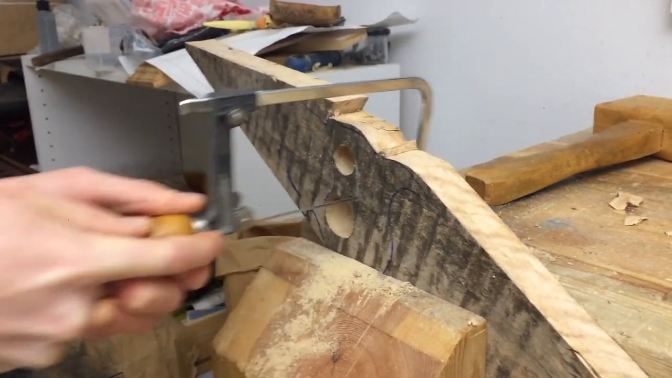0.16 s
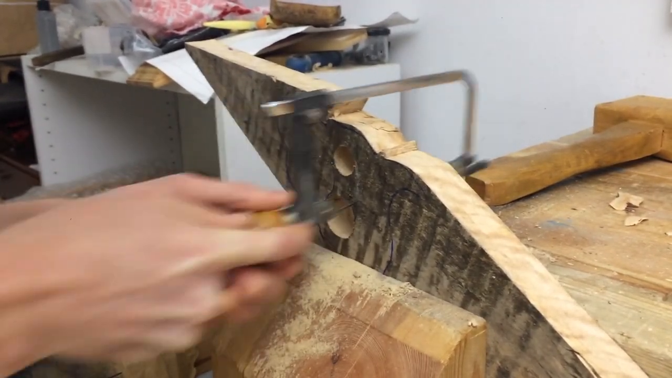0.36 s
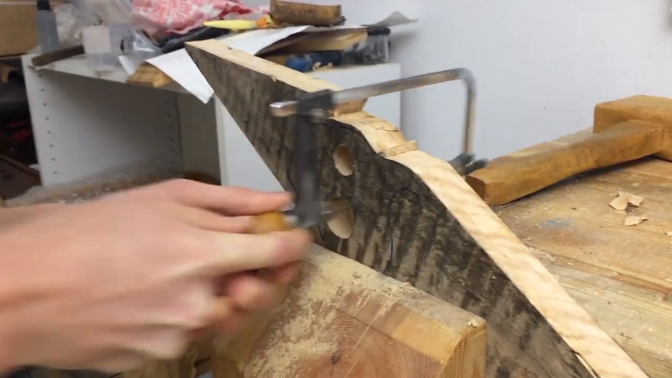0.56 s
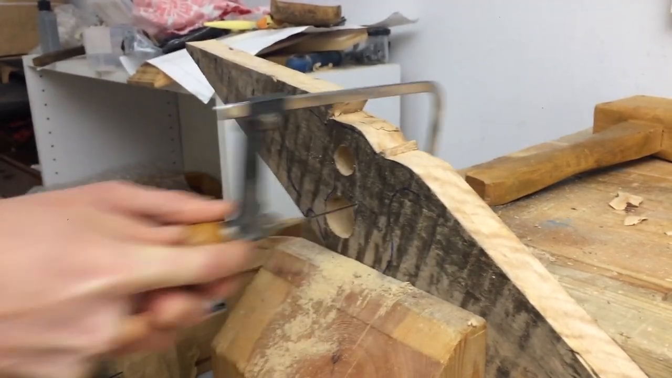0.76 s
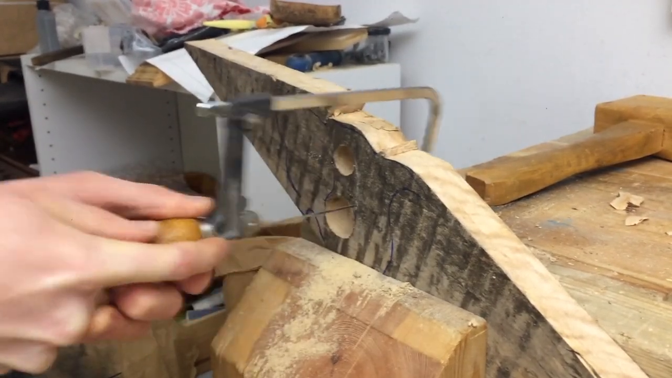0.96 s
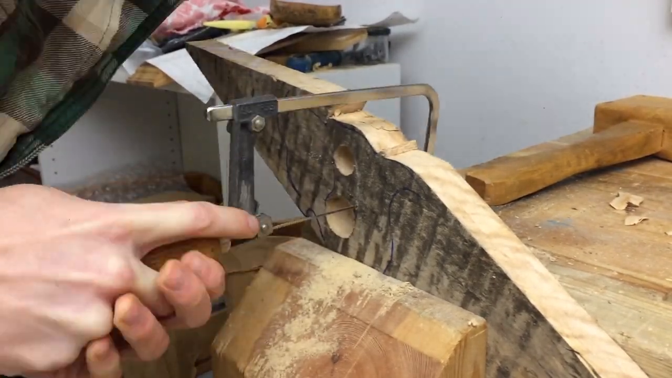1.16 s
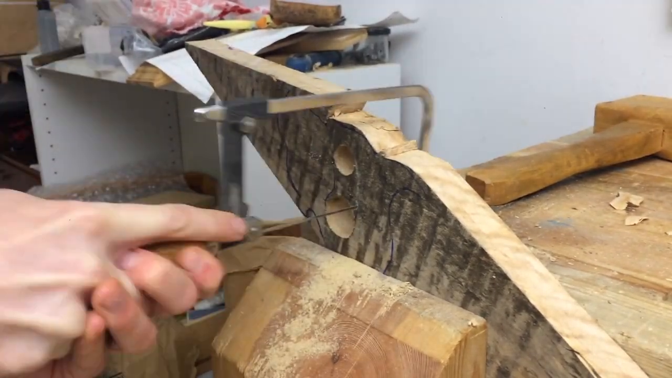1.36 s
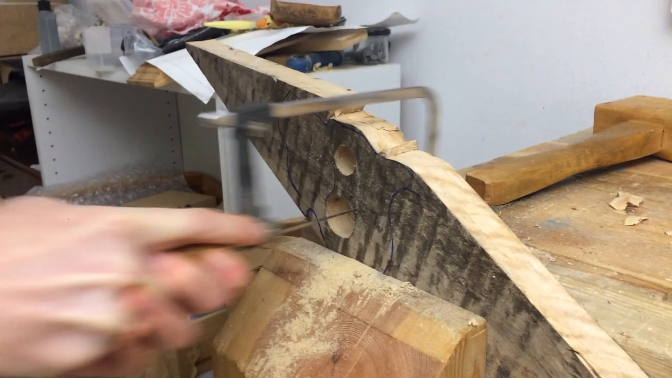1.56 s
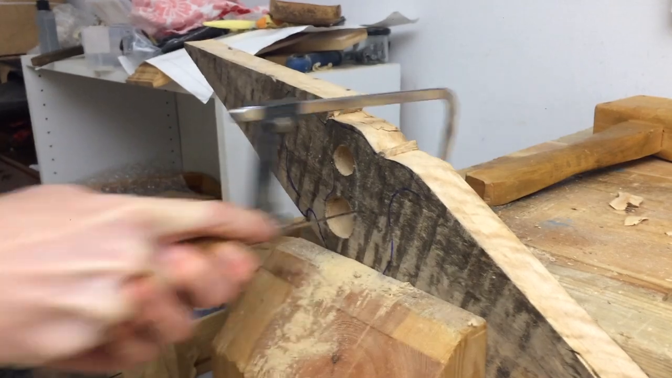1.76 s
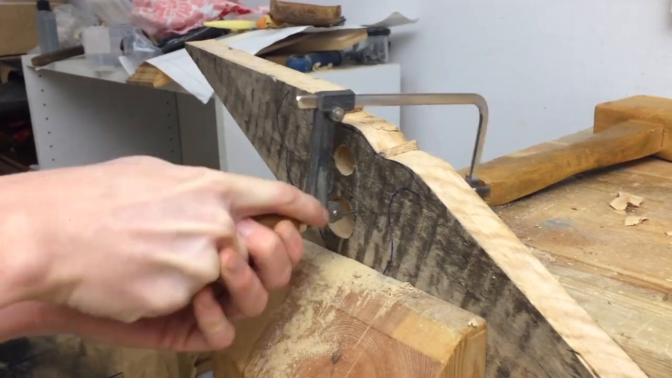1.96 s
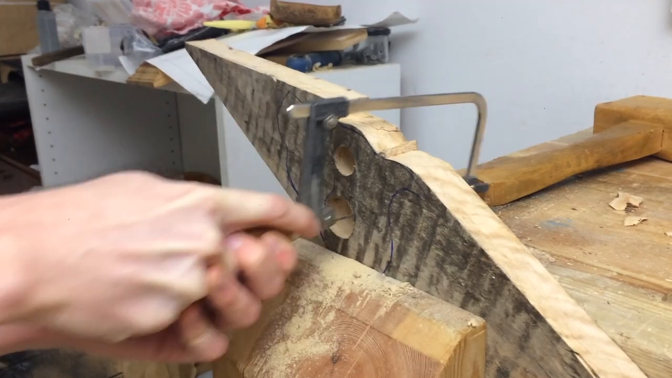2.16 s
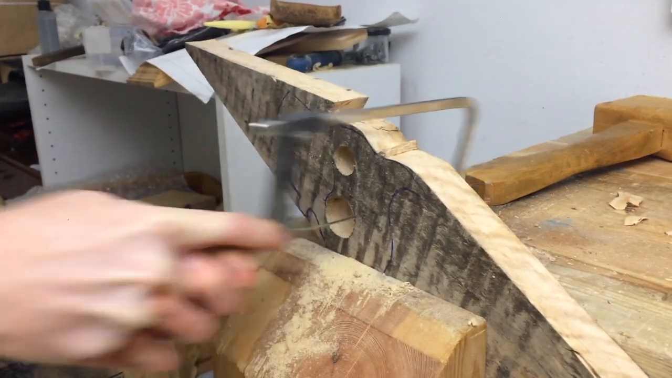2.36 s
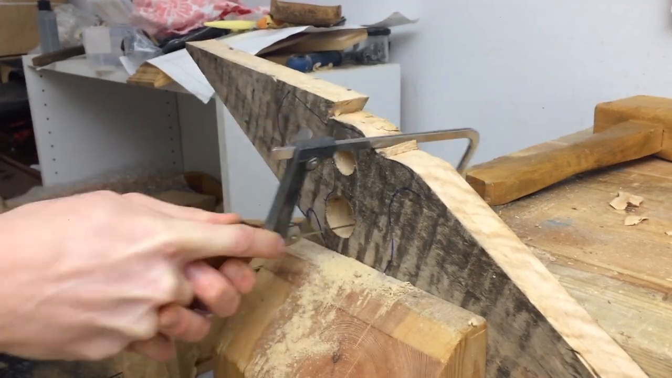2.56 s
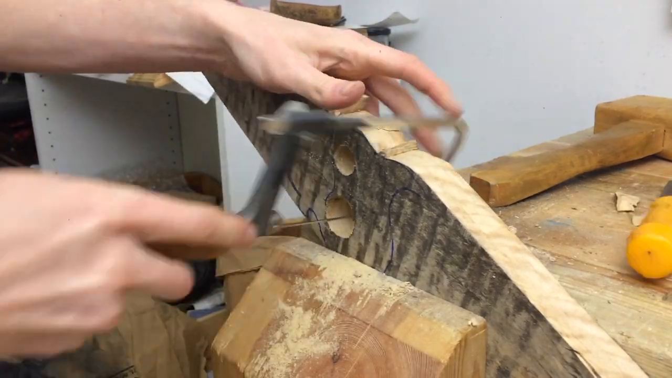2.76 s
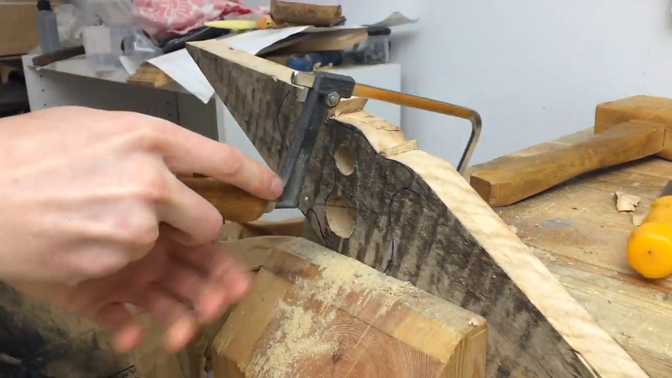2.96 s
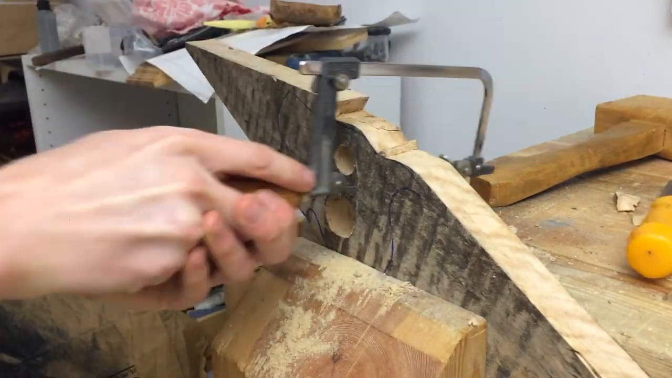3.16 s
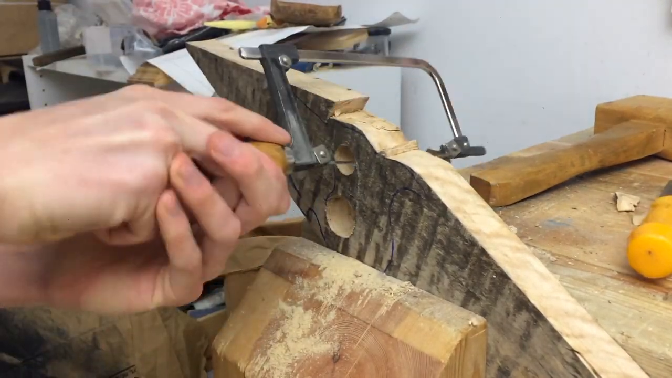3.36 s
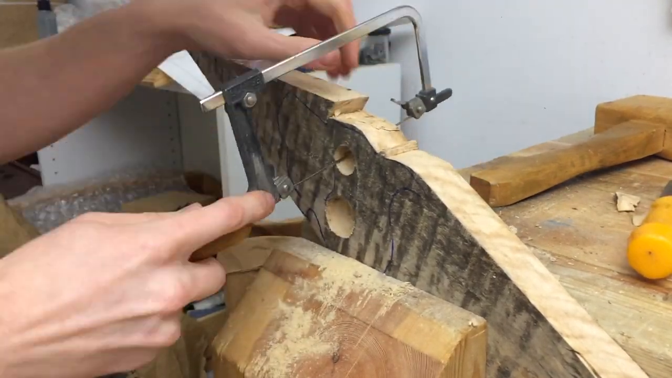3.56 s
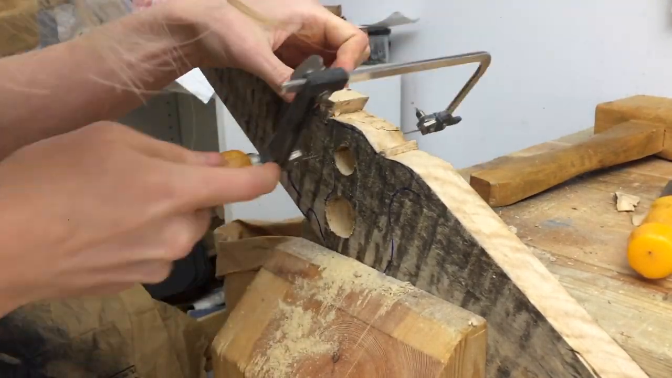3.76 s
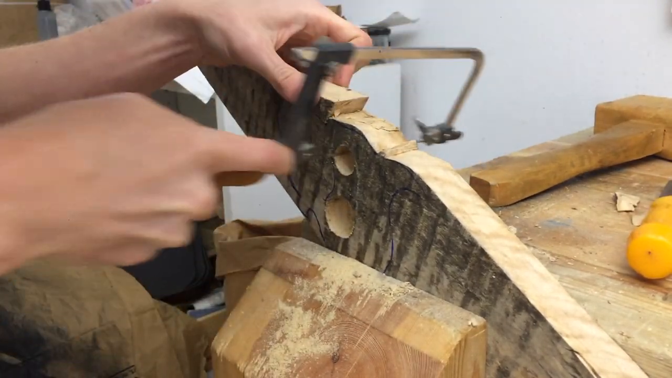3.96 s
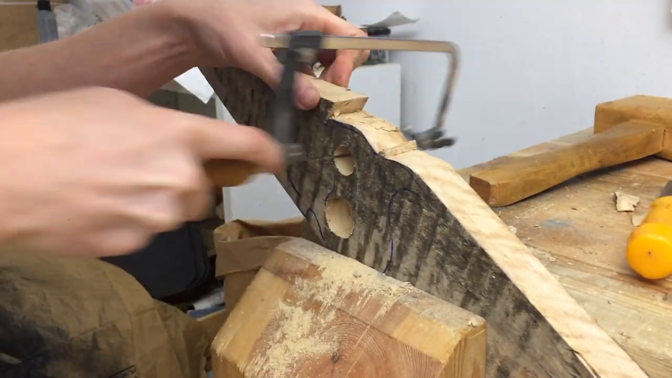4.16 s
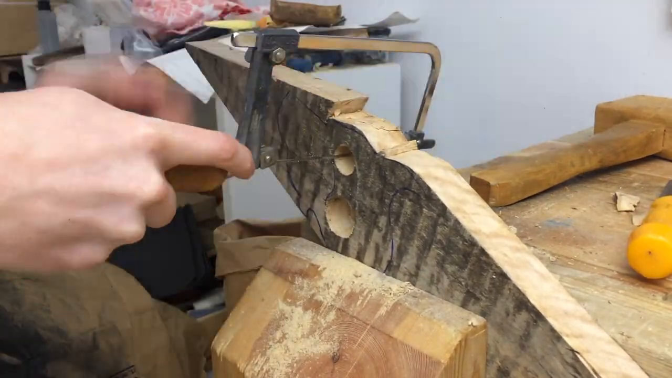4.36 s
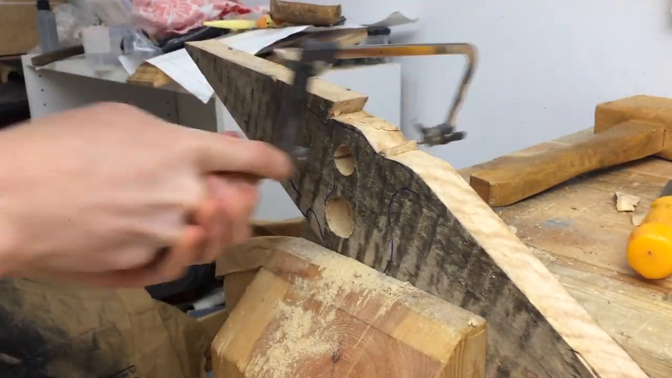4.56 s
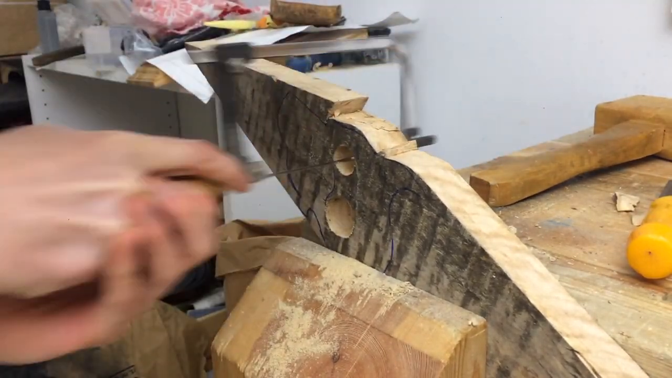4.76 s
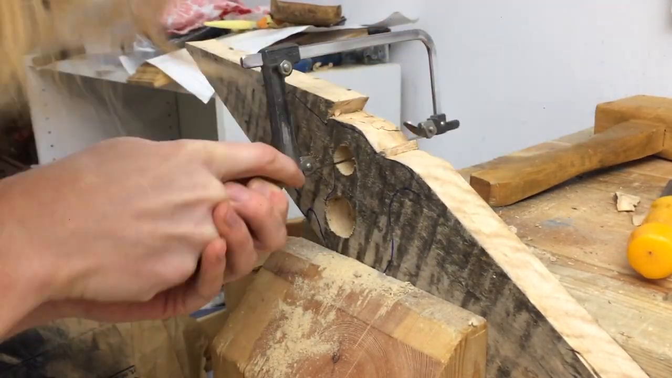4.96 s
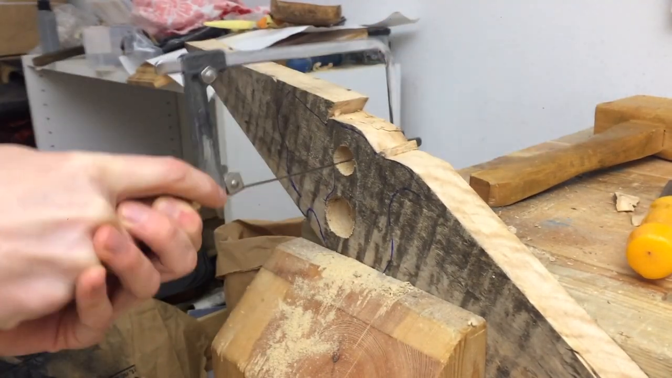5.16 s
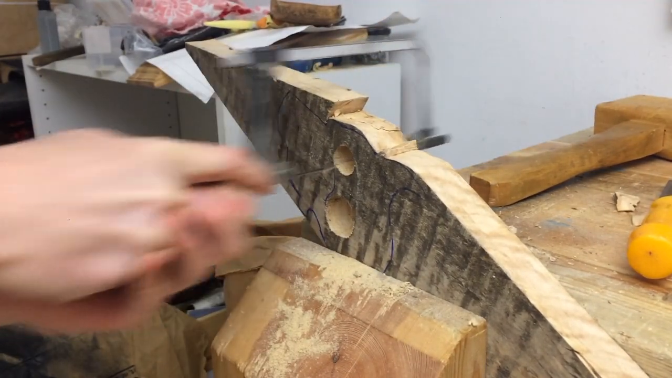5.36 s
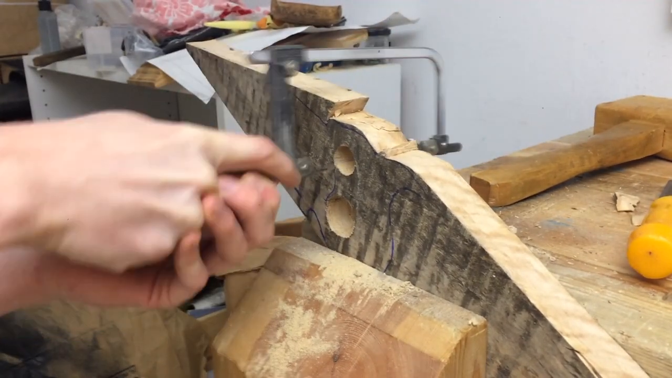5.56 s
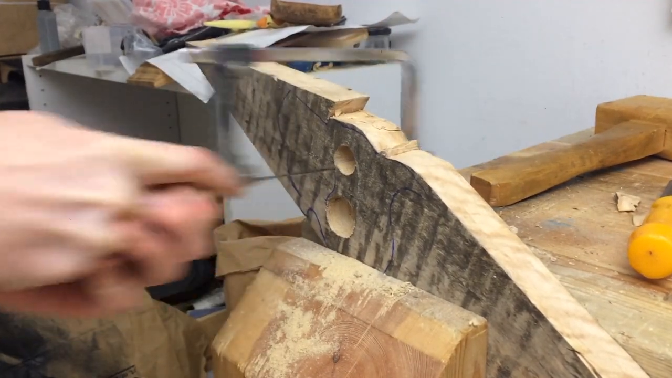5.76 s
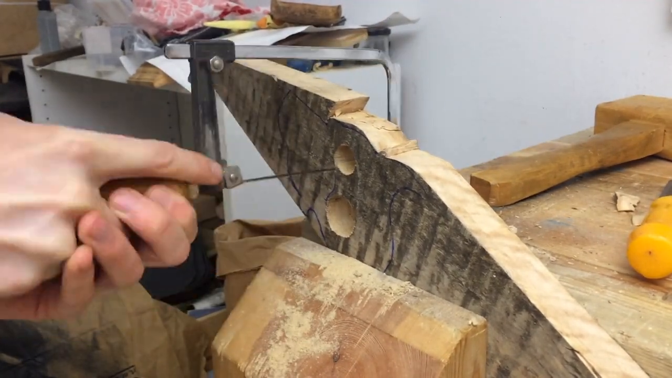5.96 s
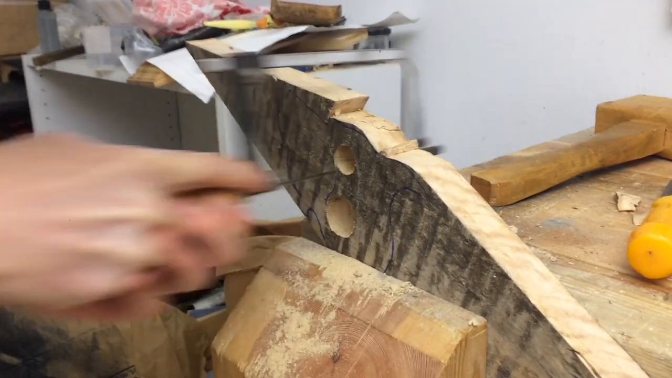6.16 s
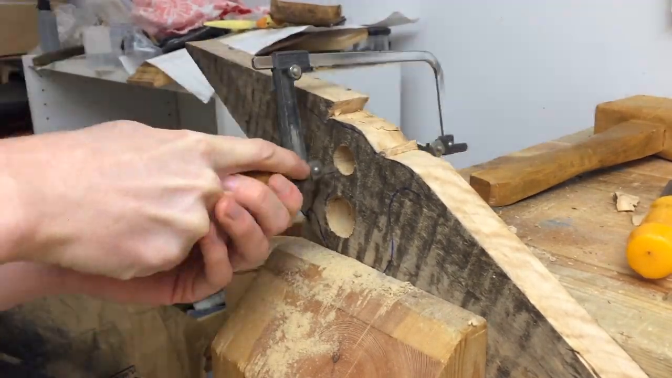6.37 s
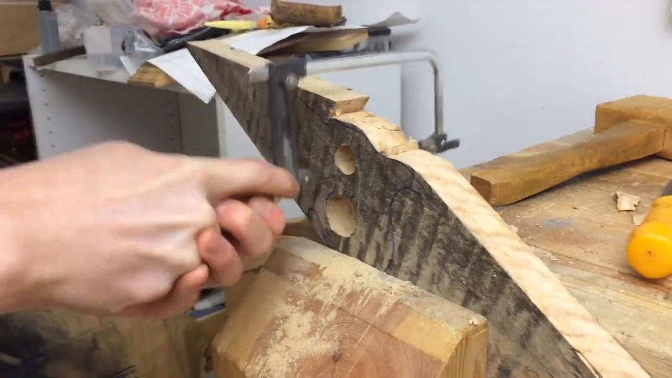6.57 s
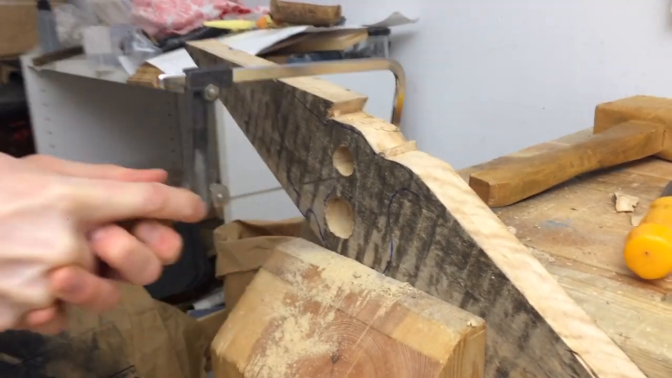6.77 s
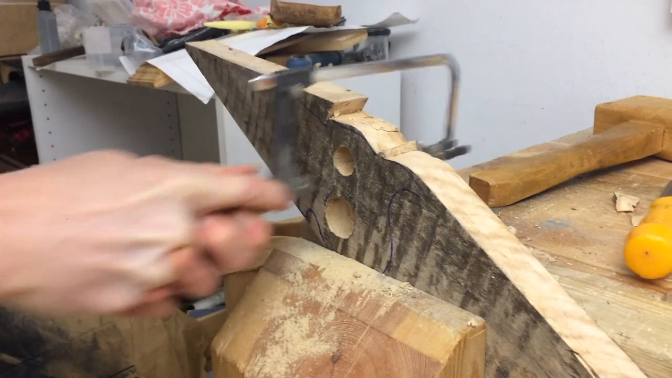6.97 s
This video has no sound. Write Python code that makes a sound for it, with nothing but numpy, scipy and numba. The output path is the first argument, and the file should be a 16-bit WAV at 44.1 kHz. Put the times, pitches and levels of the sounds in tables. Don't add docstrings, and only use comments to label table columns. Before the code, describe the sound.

Close and dry in a small workshop, with thin bass, a saw already works a clamped wooden board at fast-motion speed. From 0 to 1.1 s, about sixteen strokes a second rasp and buzz, with woody frame knocks on most early strokes. After a quiet gap, harder, ringing sawing runs from 1.4 to 2.57 s with two tiny hitches, ending in a sharp snap and clack. Faint hum, ticks and soft bumps follow; from 3.0 to 3.35 s come light, lower-pitched rubs and a hard tap at 3.17 s. A clack at 3.49 s precedes small ticks. Soft trial strokes swell from 3.85 to 4.23 s. Brighter, higher sawing builds from 4.5 s, nearly thirty strokes a second, and continues from 5.0 until a piercing clack at 5.88 s. A short uneven burst spans 6.08-6.29 s with a knock, then bright rapid sawing from 6.46 s to the cut-off at 7 s.

```python
import sys
import numpy as np
from scipy import signal
from scipy.io import wavfile
from scipy.ndimage import uniform_filter1d, minimum_filter1d
from numba import njit

SR = 44100
rng = np.random.default_rng(int(sys.argv[2]) if len(sys.argv) > 2 else 0)


def waveform_to_disk(signal):
    frames = np.transpose(np.atleast_2d(signal))
    scaled = np.clip(frames, -1, 1) * 32767
    samples = np.round(scaled).astype(np.int16)
    wavfile.write(sys.argv[1], SR, samples)


def makeup_ratio(level_db):
    decades = np.asarray(level_db, float) / 20
    return 10 ** decades


N = 308700
TIME = np.arange(N) / SR

# [t/s, pitch factor]
SPEED = [(0, 1.0117), (2.63, 0.9836), (2.66, 0.61), (2.9, 0.65), (3.06, 0.72), (3.36, 0.84), (3.62, 1.2),
         (3.82, 1.24), (4.2, 1.326), (4.45, 1.285), (7, 1.283)]
SLACK_S, SECOND_CUT_S = 2.65, 3.6

# [t/s of the fastest point, level/dB, top tooth rate f/Hz]
STARTING = [(.016,-24,2390),(.077,-28.5,2430),(.139,-19.5,2082),(.199,-25,2429),(.262,-26,2372),(.321,-25,2336),
            (.387,-25,2281),(.444,-24,2550),(.503,-26.5,2317),(.562,-26,2316),(.625,-26,2342),(.685,-26.5,2487),
            (.744,-25,2119),(.812,-24,1812),(.876,-23.5,2276),(.943,-23.5,2351),(1.002,-22.5,2400),(1.06,-25,2480)]
PRESSING = [(1.375,-46.5,2000),(1.403,-21.5,2272),(1.466,-19.5,2100),(1.526,-17,2277),(1.589,-23,2070),(1.649,-21.5,2432),(1.704,-18,2273),
            (1.769,-68,2000),(1.816,-22,2071),(1.873,-17.5,2296),(1.926,-20.5,2318),(1.982,-66.5,2000),(2.031,-20,2350),(2.083,-24,2577),
            (2.135,-20.5,2385),(2.183,-20.5,2362),(2.231,-22.5,2415),(2.279,-19,2380),(2.326,-28,2397),(2.374,-21,2380),
            (2.425,-20,2370),(2.476,-22,2282),(2.522,-23.5,2311),(2.568,-31,2552)]
THREADING = [(2.98,-62,1390),(3.034,-44,1553),(3.07,-38,1520),(3.115,-48.5,1825),(3.166,-27.5,1568),(3.2,-41,1500),
             (3.239,-35.5,1949),(3.269,-34.5,1654),(3.3,-24.5,1728),(3.325,-39,1764),(3.353,-40,2068)]
SNAP = [(3.488, -25, 1911), (3.522, -50, 1500)]
TRYING = [(3.801,-69.5,2566),(3.828,-63,2422),(3.85,-46,2560),(3.887,-40,2590),(3.925,-37,2612),(3.957,-41.5,2544),
          (3.996,-38,2620),(4.028,-36.5,2620),(4.064,-37.5,3400),(4.097,-34,2730),(4.13,-35,2577),
          (4.161,-35,2917),(4.192,-35.5,2676),(4.225,-36,2830)]
BITING = [(4.491,-53.5,2700),(4.537,-44,2720),(4.557,-36.5,2710),(4.594,-28.5,2600),(4.625,-30,3200),(4.661,-29,3250),
          (4.697,-26,2776),(4.731,-25,2231),(4.763,-24.5,2478),(4.797,-23,2699),(4.828,-25.5,2374),
          (4.858,-25,2731),(4.888,-29,2725),(4.922,-22,2718),(4.963,-31,2273)]
STEADY = [(5.002,-53.5,2726),(5.032,-29.5,2641),(5.075,-27.5,2657),(5.113,-29,2763),(5.151,-27.5,2835),(5.183,-28,3090),
          (5.22,-26.5,3000),(5.253,-31,3006),(5.289,-28,3278),(5.321,-28.5,2735),(5.356,-31.5,2910),(5.389,-28.5,3493),
          (5.428,-28,2686),(5.466,-28.5,3200),(5.501,-31.5,2988),(5.535,-35,3000),(5.568,-29.5,3206),(5.603,-30.5,3088),
          (5.638,-27,3608),(5.673,-22,3335),(5.707,-21,3084),(5.741,-29,3086),(5.779,-24.5,3044),(5.812,-26,2818),
          (5.847,-27,3457),(5.881,-25.5,3085)]
TURNING = [(6.05,-60,2750),(6.082,-28,3143),(6.13,-26.5,2801),(6.169,-27.5,2950),(6.206,-31,2302),
           (6.241,-29.5,2690),(6.285,-36,2380)]
FINISHING = [(6.457,-45,3070),(6.492,-32.5,3103),(6.529,-27.5,3166),(6.563,-27,3066),(6.601,-26,3040),(6.635,-27,2930),
             (6.673,-26.5,3108),(6.709,-24.5,3570),(6.745,-22,3980),(6.783,-26,3550),(6.818,-26,3205),
             (6.854,-24,3400),(6.888,-21,3140),(6.926,-29.5,2990),(6.96,-27,3160),(6.997,-27.5,3530)]
STROKES = [STARTING, PRESSING, THREADING, SNAP, TRYING, BITING, STEADY, TURNING, FINISHING]
# [rise/ms, fall/ms, return level/dB, board level/dB at first stroke, at last stroke]
BOUTS = [
    (11, 13, -41, -53, -50),
    (11, 9.7, -42.5, -48, -54.5),
    (14, 14, -61.5, -57.5, -48.5),
    (10, 13, -41.5, -50, -53.5),
    (7.6, 7.5, -32, -46, -51),
    (10.6, 11, -40, -43, -53),
    (6.0, 11, -39, -51, -49.5),
    (6, 10, -39.5, -44.5, -49.5),
    (7.5, 8, -37.5, -45, -46),
]
# [last return level/dB, after-ring level/dB, hum level/dB, rustle level/dB at start, at end]
PAUSES = [(-45.5, -59, -70, -72, -75.5), (-49.5, -54.5, -65.5, -83.5, -64.5), (-63.5, -76, -66.5, -73, -67),
          (-60, -68, -68, -72, -78), (-34.5, -61, -73.5, -75, -74), (-66, -108, -77, -79, -67),
          (-50.5, -47.5, -72, -78, -78), (-74, -91, -72.5, -91, -68)]
RISE_MS_PER_DB, FALL_MS_PER_DB = 0.27, -0.29
RETURN_PER_DB, RETURN_UNDER_DB, RETURN_SCATTER_DB = -0.72, -5.5, 2
# [t/s, length/s, level/dB]
DRAGS = [(0, 0.0086, -43.5), (1.359, .018, -56.5), (2.962, 0.023, -54), (3.031, .02, -40),
         (3.059, .032, -40), (3.177, .04, -45), (6.269, 0.026, -48)]

# [multiple of the tooth rate, level/dB in first cut, level/dB in second cut]
TOOTH = [(1, -14, -16), (2, -9, -9), (3, -4, -5), (4, -11, -13.5)]
SING_DB = [0.1, 1.2, 0.1, 0.1, 0.1, 1.3, 1.4, 1.08, 2.5]
BRIGHT_DB = [2.9, 2, -0.5, -3, -2.5, -4, 3, 5.5, 3.5]
# [f/Hz, width/Hz, lift/dB]
BLADE_FIRST = [(2100, 47, 13.5), (3052, 69, 13.5), (4090, 135, 19), (4300, 33, 2.5), (4730, 130, 3.5),
               (5240, 160, 8), (6025, 130, 6.5), (7030, 140, 6.5), (7164, 90, 6), (7254, 500, 8),
               (11950, 1600, 10.5), (15300, 1200, 12.5), (5505, 2620, 6.5)]
# [f/Hz, width/Hz, lift/dB]
BLADE_SLACK = [(3010, 146, 15.5), (4150, 107, 15), (5449, 1500, 4.5), (11480, 590, 0), (13700, 3800, -10),
               (16300, 1499, 10.5), (18600, 2800, -4)]
# [f/Hz, width/Hz, lift/dB]
BLADE_SECOND = [(3200, 630, 6.1), (3953, 170, 14.3), (5270, 262, 11.65), (5870, 520, 5.4), (6960, 460, 5.6),
                (8500, 63, 3.3), (8920, 210, 6.6), (9180, 160, 5.2), (9700, 170, 6.4), (9330, 850, 5.5),
                (11090, 540, 8.6), (14480, 550, 7), (5540, 820, 2.8), (8190, 3860, 4.06)]
BUZZ_FOCUS, TEAR_FOCUS = 0.76, 0.73
WANDER, PATCHY_DB = 0.008, 2

# [f/Hz, width/Hz, level/dB]
BOARD_FIRST = [(246, 3600, -14), (443, 65.6, 8), (630, 420, -2.5), (950, 340, -0.5), (1220, 70, -0.5),
               (1770, 2200, -8.5)]
# [f/Hz, width/Hz, level/dB]
BOARD_SLACK = [(441, 60, 7), (897, 65, 5.5), (1150, 68, -3), (2220.5, 130, -3.5), (2950, 120, -4),
               (1500, 1700, -13.5)]
# [f/Hz, width/Hz, level/dB]
BOARD_SECOND = [(350, 1100, -19), (639, 120, 0.5), (1001, 82, -3.5), (1160, 91, -2.5), (1380, 49, -2.5),
                (1664, 130, -6.5), (2480, 37, -16), (2750, 54, -11)]
CHATTER, GRAIN_DB = 0.82, 2.4
BUZZ_DB, BUZZ_SCATTER_DB, BUZZ_JITTER = -1.0, 2.0, 0.4
DRONE_DB = [-50, -56.5, -64, -63, -66, -62.5, -61, -62, -56]
DRONE_HZ, SECOND_DRONE_HZ, DRONE_WIDTH_HZ = 427, 453.6, 45

# [t/s, peak level/dB, f/Hz]
KNOCKS = [(0.056, -26, 1230), (0.118, -29.5, 1285), (0.179, -28.5, 1220), (0.239, -23.5, 1230),
          (0.303, -33, 1254), (0.363, -28, 828), (0.422, -22.5, 887), (0.484, -29.5, 824),
          (0.543, -22.5, 830), (0.606, -31, 1295), (0.663, -23.5, 840), (0.742, -36, 1259),
          (1.265, -50.5, 977), (2.004, -33.5, 900), (2.566, -26.5, 2820), (2.609, -25.5, 3054),
          (3.485, -24, 799), (3.639, -46, 1310), (4.421, -46.5, 1538), (6.078, -58, 3800),
          (6.226, -28, 1500), (6.408, -62, 1550), (6.49, -28, 3205)]
CLICK_DB, CLICK_S, CLICK_HZ, CLICKS_END_S = 2.5, 0.0018, 2000, 0.8
# [t/s, peak level/dB,
# f/Hz]
TICKS = [(2.6773, -57, 7160), (2.6938, -53.5, 7040), (2.8417, -51.5, 5540), (2.855, -52, 8160),
         (2.873, -48, 10800), (2.885, -49, 3400), (2.9662, -44, 4300), (2.978, -42, 4210), (3.6, -57, 5010),
         (3.642, -46.5, 6000), (3.6827, -56, 6500), (3.715, -55, 4630), (3.767, -58, 8360),
         (4.355, -64, 6660), (4.482, -48.5, 4000), (4.5, -44, 4050), (4.51, -48, 4974), (5.884, -22, 4785),
         (5.955, -61, 5984)]
# [t/s, peak level/dB, f/Hz, ring/s]
THUDS = [(1.268, -51, 288, 0.037), (2.61, -47, 172, 0.044), (2.783, -58, 287.5, 0.13),
         (2.884, -53.5, 148.2, 0.18), (3.028, -44, 269.5, .06), (3.169, -41, 140.2, 0.05),
         (3.312, -45.5, 143, 0.049), (3.495, -35.5, 410, 0.13), (3.641, -71, 250, 0.053),
         (1.265, -47, 1150, 0.022), (3.593, -59, 1200, 0.044), (3.719, -54, 982, 0.046),
         (6.406, -50.5, 1500, 0.028), (4.421, -48, 1500, 0.025), (5.8836, -15.5, 5070, 0.026),
         (5.885, -17.5, 3890, 0.015), (6.489, -20.5, 3200, 0.024), (3.171, -26.5, 1850, 0.033),
         (3.171, -31.5, 1593, 0.044), (3.171, -31, 2280, 0.039), (3.171, -33, 620, 0.044)]
# [t/s, peak level/dB, centre f/Hz, width/Hz, decay/ms]
CATCHES = [(1.264, -50, 1299, 3500, 2.6), (2.5704, -14, 8020, 9000, 1.2), (2.608, -31.5, 7000, 12000, 2.3),
           (3.026, -35, 5000, 9000, 3), (3.172, -22, 2400, 3500, 1.8), (3.485, -29, 4500, 6000, 1.7),
           (3.449, -55, 906, 1500, 4.7), (4.355, -54, 1500, 2980, 3), (4.356, -53, 7500, 3020, 2.8),
           (4.423, -48, 1300, 3000, 2.5), (4.455, -59, 1600, 700, 3.7), (6.077, -29, 6000, 9000, 3),
           (6.405, -46.5, 900, 2000, 3), (6.489, -23, 2813, 4500, 1.7), (6.587, -34, 1500, 3000, 1.75),
           (6.697, -29.5, 2000, 4000, 2.14)]
# [from t/s, to t/s, level/dB, f/Hz, width/Hz]
WHISK = (3.36, 3.72, -70, 12200, 900)

STOP_S, AFTER_RING_S = 0.014, 0.019
HUM_SWAY_DB = 2.2
ROOM_T60_S, ROOM_DB = 0.036, -13


def curve(rows, column=1):
    rows = np.array(rows)
    return np.interp(TIME, rows[:, 0], rows[:, column])


def by_bout(values):
    return curve([(bout[k][0], value) for bout, value in zip(STROKES, values) for k in (0, -1)])


def unit(x):
    return x / np.sqrt(np.mean(x ** 2))


def flicker(rate):
    hold = int(SR / rate)
    levels = np.repeat(rng.standard_normal(N // hold + 1), hold)
    return 1.3 * uniform_filter1d(levels, hold)[:N]


def place(out, s, sound):
    start = int(s * SR)
    out[start:start + len(sound)] += sound


def highpass(x, hz, order=2):
    return signal.sosfilt(signal.butter(order, hz, "high", fs=SR, output="sos"), x)


@njit
def svf(x, hz, width):
    y, b, l, g, k = np.empty(len(x)), 0., 0., 0., 0.
    for i in range(len(x)):
        if i & 31 == 0:
            g = np.tan(np.pi * min(hz[i] / SR, .47))
            k = width[i] / hz[i]
        v = (b + g * (x[i] - l)) / (1 + g * (g + k))
        b, l, y[i] = 2 * v - b, l + 2 * g * v, k * v
    return y


def band(x, hz, width):
    return svf(x, np.full(len(x), float(hz)), np.full(len(x), float(width)))


def body(x, modes, pitch):
    out = 0
    for k, (hz, width, db) in enumerate(sorted(modes)):
        out = out + (-1) ** k * makeup_ratio(db) * svf(x, hz * pitch, width * pitch)
    return out


def steel(x, modes, pitch):
    for hz, width, db in modes:
        x = x + (makeup_ratio(db) - 1) * svf(x, hz * pitch, width * pitch)
    return highpass(x, 2300)


def two_cuts(ring, push, mode_sets, pitch):
    a, b = int(SLACK_S * SR), int(SECOND_CUT_S * SR)
    first, slack, second = mode_sets
    return np.r_[ring(push[:a], first, pitch[:a]),
                 ring(push[a:b], slack, pitch[a:b]),
                 ring(push[b:], second, pitch[b:] / SPEED[-1][1])]


def taps(table, partials, ring, crack_db, crack_hz, spread, early_s):
    out, t = np.zeros(N + SR), np.arange(SR // 10) / SR
    noise = rng.standard_normal((len(table), len(t)))
    fade = np.exp(-np.log(1000) * t / ring) * (1 - np.exp(-t / 0.0018))
    for (s, db, hz), hiss in zip(table, noise):
        tone = sum(makeup_ratio(g_db) * np.sin(2 * np.pi * min(hz * ratio, 16000) * t) for ratio, g_db in partials)
        wobble = 1 + 5.7 * uniform_filter1d(hiss, size=40)
        centre = max(crack_hz, hz)
        crack = band(hiss, centre, spread * hz)
        crack = unit(band(crack, centre, 2 * spread * hz)) * np.std(crack)
        usual = np.sqrt(np.sum((fade * crack) ** 2) / np.sum(fade ** 2) / np.mean(crack ** 2))
        crack = crack / usual
        place(out, s - early_s, makeup_ratio(db) * fade * (tone * wobble + makeup_ratio(crack_db) * crack))
    return highpass(out[:N], 330)


def drags(edge_s=0.00196):
    press = np.zeros(N)
    for s, length, db in DRAGS:
        press += makeup_ratio(db) * np.clip(np.minimum(TIME - s, (s + length - TIME) / 2) / edge_s, 0, 1)
    return press


def drone(pitch, lead_s=0.013, tail_s=0.024):
    on = np.zeros(N)
    for bout, db in zip(STROKES, DRONE_DB):
        inside = np.minimum(TIME - bout[0][0] + lead_s, bout[-1][0] + tail_s - TIME)
        on += makeup_ratio(db) * np.clip(inside * 100, 0, 1)
    hz = np.where(TIME < SECOND_CUT_S, DRONE_HZ, SECOND_DRONE_HZ) * pitch
    hum = svf(makeup_ratio(8.7 * flicker(40)) * rng.standard_normal(N), hz, DRONE_WIDTH_HZ * pitch)
    return unit(svf(hum, hz, 3.0 * DRONE_WIDTH_HZ * pitch)) * on


def stroke_rows():
    rows = []
    last_returns = [pause[0] for pause in PAUSES] + [BOUTS[-1][2]]
    for bout, (rise, fall, back_db, *_), last_db in zip(STROKES, BOUTS, last_returns):
        s, db, hz = np.array(bout).T
        harder = np.clip(db - np.median(db), -6, 6)
        back = back_db + RETURN_PER_DB * harder + RETURN_SCATTER_DB * rng.standard_normal(len(s))
        back[-1] = last_db
        rows.append(np.c_[s, rise + RISE_MS_PER_DB * harder, fall + FALL_MS_PER_DB * harder, db, hz,
                          np.minimum(back - db, RETURN_UNDER_DB), harder])
    return np.vstack(rows)


def strokes(rise_pow=1.73, fall_pow=2.55, back_pow=0.88, slowest=0.15, speed_up=0.6, slow_down=1.9,
            back_skew=0.57):
    cut, back, tooth_hz = np.zeros(N), np.zeros(N), np.full(N, 1000.)
    rows = stroke_rows()
    starts = rows[:, 0] - rows[:, 1] / 1000
    gaps = np.diff(starts)
    cycle = np.r_[np.minimum(gaps, 1.08 * signal.medfilt(gaps, kernel_size=5)), gaps[-1]]
    for (s, rise, fall, db, hz, back_db, harder), start, period in zip(rows, starts, cycle):
        rise, fall = 1.1 * rise / 1000, 1.5 * fall / 1000
        part = slice(max(int((s - rise) * SR), 0), int((s + fall) * SR))
        late = TIME[part] - s
        rising = late < 0
        arc = np.cos(np.pi / 2 * np.clip(late / np.where(rising, rise, fall), -1, 1))
        bite = 1 + np.clip(.4 + harder / 3.5, 0, 1.7) * np.exp(-(late / .0024) ** 2)
        cut[part] += makeup_ratio(db - 2.5) * bite * arc ** np.where(rising, rise_pow, fall_pow)
        tooth_hz[part] = hz * (slowest + (1 - slowest) * arc ** np.where(rising, speed_up, slow_down))
        first, last = s + 0.84 * fall, max(start + period + 0.00073, s + fall + 0.0025)
        part = slice(int(first * SR), int(last * SR))
        arc = np.sin(np.pi * np.clip((TIME[part] - first) / (last - first), 0, 1) ** back_skew)
        back[part] += makeup_ratio(db + back_db + 2.0) * arc ** back_pow
    return cut, back, tooth_hz


def blade(cut, back, tooth_hz, pitch, squeal_db=-32.0, bright_db=7.0):
    phase = 2 * np.pi * np.cumsum(tooth_hz * (1 + 0.01188 * flicker(900))) / SR
    second = TIME > SECOND_CUT_S
    teeth = np.zeros(N)
    for order, db, late_db in TOOTH:
        teeth += makeup_ratio(np.where(second, late_db, db) + 1.2 * flicker(450)) * np.sin(order * phase)
    top_hz = -minimum_filter1d(-tooth_hz, size=SR // 40)
    teeth = teeth * (tooth_hz / top_hz) ** BUZZ_FOCUS * makeup_ratio(by_bout(SING_DB))
    tearing = makeup_ratio(2.2 * flicker(1500)) * rng.standard_normal(N)
    for hz in (3000., 11000.):
        tearing = tearing + (makeup_ratio(PATCHY_DB * flicker(120)) - 1) * svf(tearing, hz * pitch, hz * pitch / 2)
    tear = cut / (1 + cut / makeup_ratio(squeal_db)) * makeup_ratio(9.5) * (tooth_hz / top_hz) ** TEAR_FOCUS
    push = cut * teeth + (tear + back) * tearing
    lift = makeup_ratio(bright_db * np.clip(top_hz / pitch / 2300 - 1, -.2, .2) + by_bout(BRIGHT_DB))
    push = push + (lift - 1) * svf(push, 7200 * pitch, 3500 * pitch)
    wandering = pitch * (1 + WANDER * flicker(25))
    return two_cuts(steel, push, (BLADE_FIRST, BLADE_SLACK, BLADE_SECOND), wandering) * makeup_ratio(-13.0)


def board(cut, back, tooth_hz, pitch, depth=0.55, full_db=-21.0, buzz_depth=0.42):
    soft_cut = cut / (1 + cut / makeup_ratio(full_db))
    press = (soft_cut + back) ** depth
    usual = np.sqrt(np.abs(uniform_filter1d(press ** 2, size=SR // 14))) + 0.41
    push = press / usual * makeup_ratio(2.2 * flicker(300) + GRAIN_DB * flicker(80))
    fibres = np.clip(rng.standard_normal(N), -2.9, 2.9)
    push = push * fibres * np.abs(fibres) ** (3 * CHATTER)
    slowing = uniform_filter1d(1. * (np.gradient(tooth_hz) < 0), size=90)
    phase = 2 * np.pi * np.cumsum(tooth_hz * (1 + BUZZ_JITTER * flicker(500))) / SR
    buzz = makeup_ratio(BUZZ_DB + BUZZ_SCATTER_DB * flicker(60)) * slowing * np.sin(phase)
    push = push + buzz * soft_cut ** buzz_depth / usual
    drum = two_cuts(body, push, (BOARD_FIRST, BOARD_SLACK, BOARD_SECOND), pitch)
    levels = [(bout[k][0] - k * 1e-3, how[3 - k]) for bout, how in zip(STROKES, BOUTS) for k in (0, -1)]
    return unit(drum) * makeup_ratio(curve(levels) + 1.0)


def clicks():
    out, t = np.zeros(N), np.arange(SR // 100) / SR
    for (s, db, _), hiss in zip(KNOCKS, rng.standard_normal((len(KNOCKS), len(t)))):
        if s < CLICKS_END_S:
            place(out, s - 0.0015, makeup_ratio(db + CLICK_DB) * hiss * np.exp(-t / CLICK_S))
    return band(band(out, CLICK_HZ, 3600), CLICK_HZ, 3600)


def knocks():
    partials = [(1, -7.5), (.38, -8.5), (0.6, -9.0), (2.1, -21.5), (5.7, -34.5)]
    return taps(KNOCKS, partials, ring=0.058, crack_db=6.0, crack_hz=1150, spread=0.43, early_s=0.001163)


def pauses(pitch):
    rows, ring = [], np.zeros(N)
    for done, coming, (_, ring_db, hum_db, first_db, last_db) in zip(STROKES, STROKES[1:], PAUSES):
        stop = done[-1][0] + STOP_S
        rows += [(stop, first_db, hum_db), (max(coming[0][0], stop), last_db, hum_db)]
        ring += makeup_ratio(ring_db) * np.exp(-np.abs(TIME - stop) / AFTER_RING_S)
    hiss = makeup_ratio(1.5 * flicker(60)) * rng.standard_normal(N)
    cloth = [(3400, 3600, 2.4), (7040, 3300, 3.3), (12000, 2800, 2.2), (16000, 5000, 1.5)]  # Hz, width Hz, dB
    rustle = body(hiss, cloth, pitch ** .6)
    sway = makeup_ratio(HUM_SWAY_DB * flicker(25)) * rng.standard_normal(N)
    bench = [(240.7, 130, -4.5), (414.6, 20, 10.5), (880, 770, -4), (1460, 210, -12.0)]
    hum = body(sway, bench, pitch)
    return unit(rustle) * makeup_ratio(curve(rows)) + unit(hum) * (makeup_ratio(curve(rows, column=2)) + ring)


def catches():
    out, t = np.zeros(N), np.arange(SR // 25) / SR
    noise = rng.standard_normal((len(CATCHES), len(t)))
    for (s, db, hz, width, decay_ms), hiss in zip(CATCHES, noise):
        burst = band(hiss * np.exp(-t * 1000 / decay_ms), hz, width)
        burst = band(burst, hz, 2 * width)
        place(out, s, makeup_ratio(db) * burst / np.max(np.abs(burst)))
    return out


def thuds(soft_cycles=0.84):
    out, t = np.zeros(N + SR), np.arange(SR // 4) / SR
    for s, db, hz, ring in THUDS:
        shape = np.exp(-np.log(1000) * t / ring) * (1 - np.exp(-t * hz / soft_cycles))
        place(out, s, makeup_ratio(db) * shape * np.sin(2 * np.pi * hz * t))
    return out[:N]


def ticks():
    return taps(TICKS, [(1.2, -23.0), (0.95, -32)], ring=0.032, crack_db=4.0, crack_hz=4500, spread=1.74,
                early_s=0.00024)


def whisk(pitch):
    start, end, db, hz, width = WHISK
    on = np.clip(np.minimum(TIME - start, end - TIME) * 20, 0, 1)
    return unit(svf(rng.standard_normal(N), hz * pitch, width * pitch)) * makeup_ratio(db) * on


def room(near):
    t = np.arange(SR // 8) / SR
    tail = rng.standard_normal(len(t)) * np.exp(-np.log(1000) * t / ROOM_T60_S)
    return makeup_ratio(ROOM_DB) * signal.fftconvolve(near, tail / np.sqrt(np.sum(tail ** 2)))[:N]


def scene():
    pitch = curve(SPEED)
    cut, back, tooth_hz = strokes()
    back = back + drags()
    saw = blade(cut, back, tooth_hz, pitch) + board(cut, back, tooth_hz, pitch) + drone(pitch)
    contacts = knocks() + clicks() + thuds() + ticks() + catches()
    near = saw + contacts + whisk(pitch)
    return (near + room(near) + pauses(pitch))[None]


def roll_off(x):
    return signal.sosfilt(signal.butter(12, 17000, fs=SR, output="sos"), x)


def record(dry):
    thin = highpass(dry, 300, order=1)
    top = signal.sosfilt(signal.ellip(10, .2, 70, 15750, fs=SR, output="sos"), thin)
    return roll_off(top)


dry = scene()
out = record(dry)
waveform_to_disk(out)
```